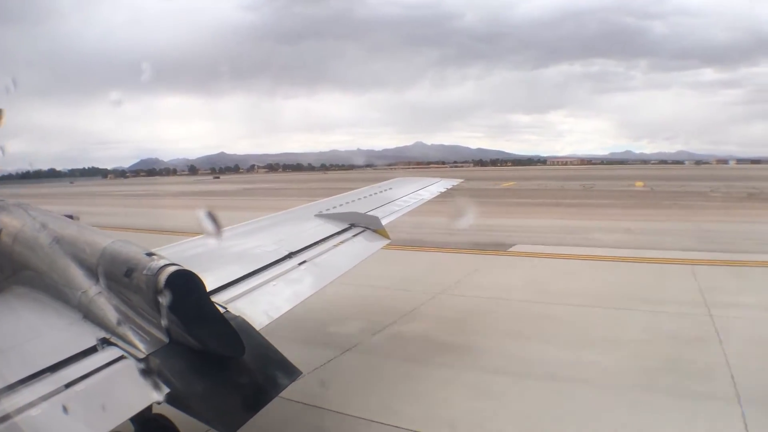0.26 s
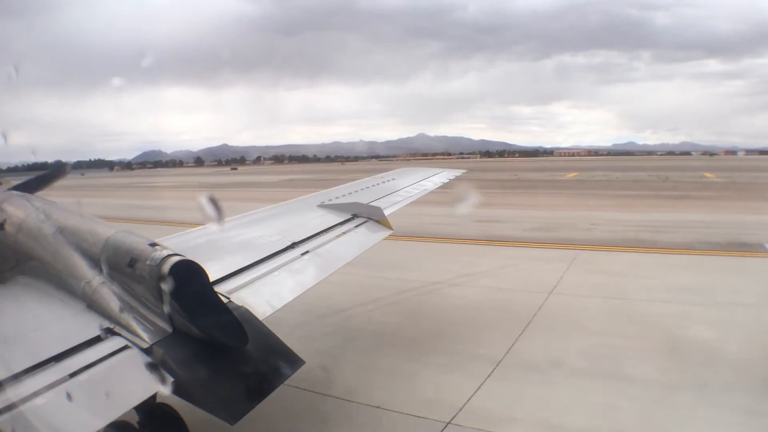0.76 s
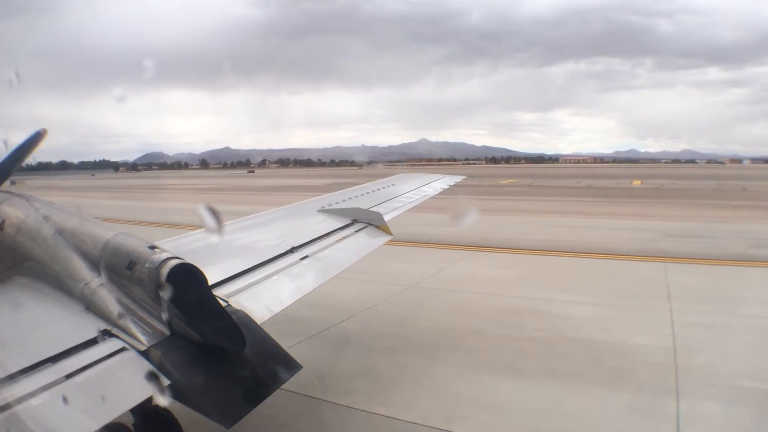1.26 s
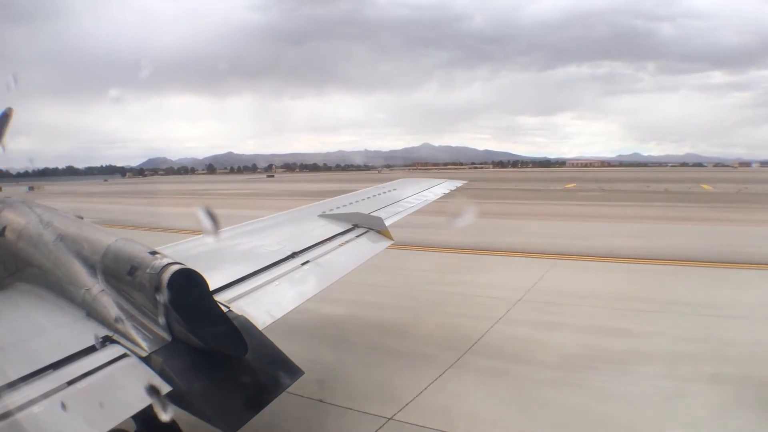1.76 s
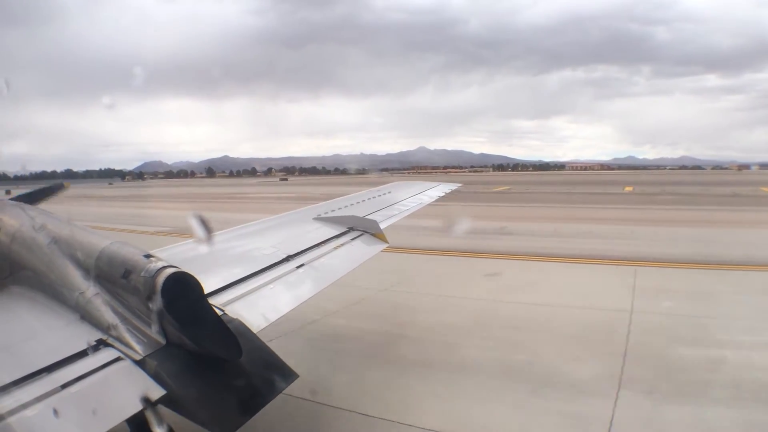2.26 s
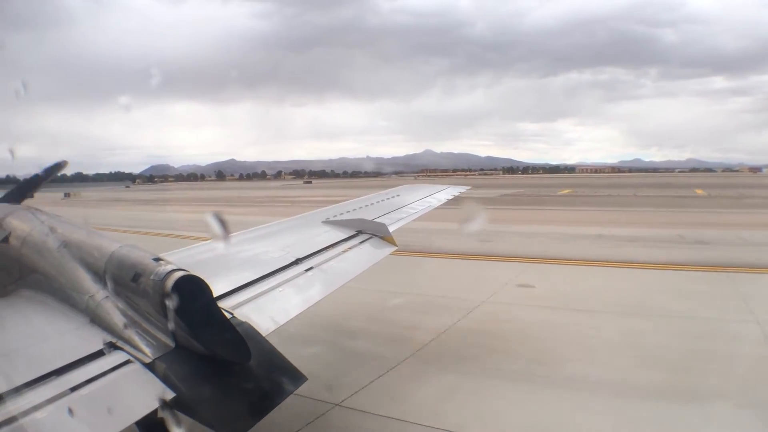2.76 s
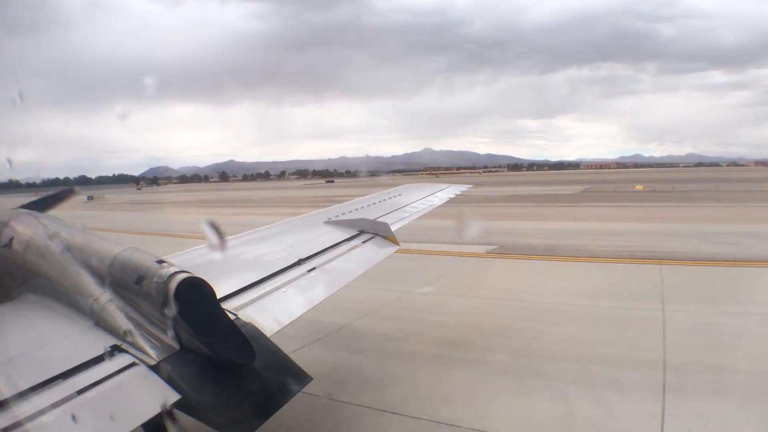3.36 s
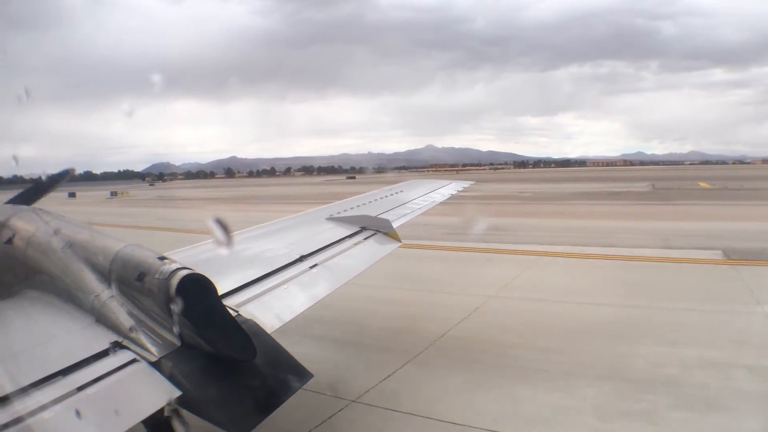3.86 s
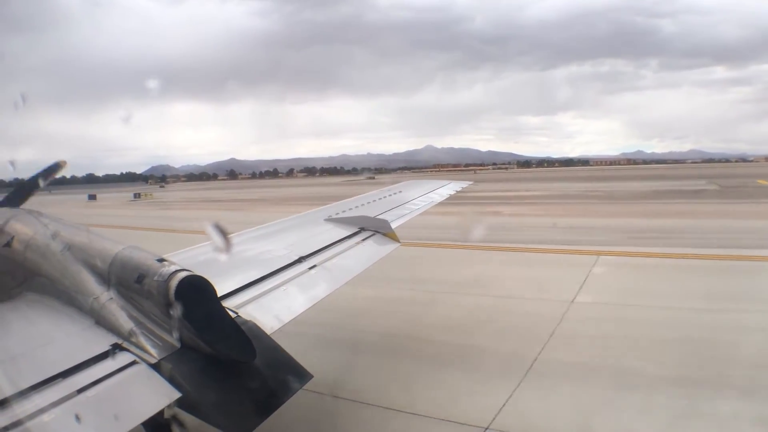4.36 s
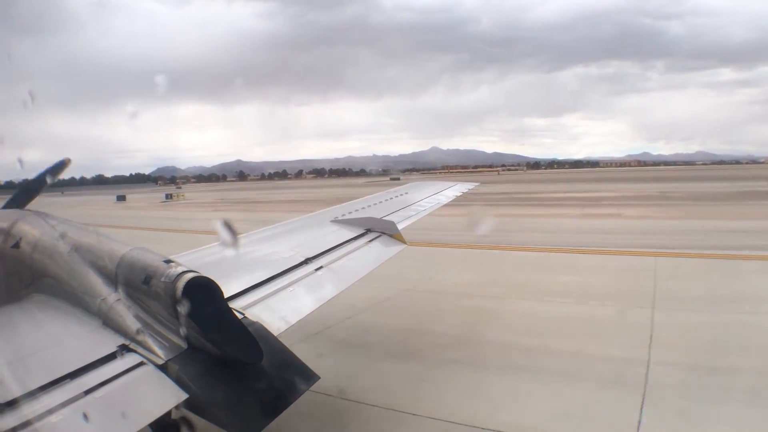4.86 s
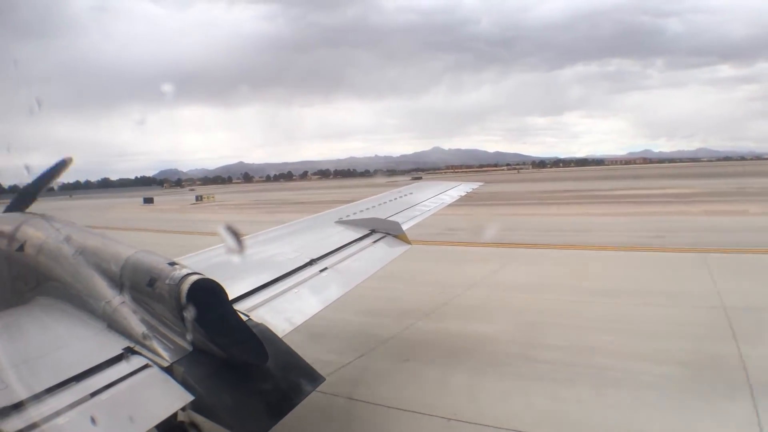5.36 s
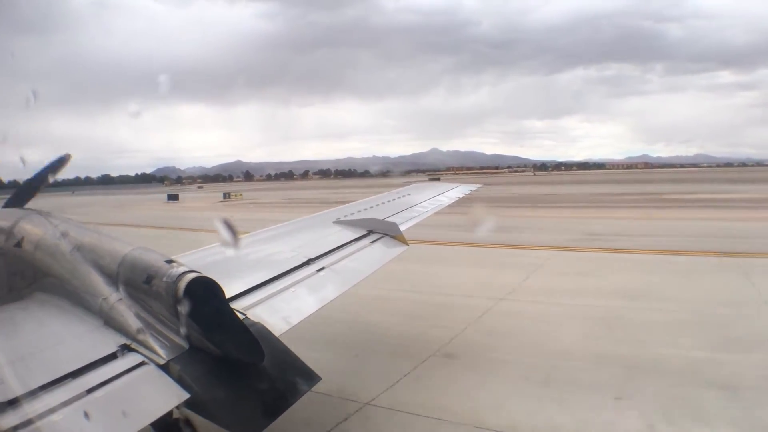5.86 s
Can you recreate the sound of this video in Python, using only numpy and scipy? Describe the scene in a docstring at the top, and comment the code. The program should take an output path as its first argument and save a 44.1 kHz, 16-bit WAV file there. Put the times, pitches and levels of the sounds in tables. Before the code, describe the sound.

Inside the cabin of a small twin turboprop taxiing over concrete, a continuous bass-heavy roar fills the space, its low mids surging unevenly beneath a dull, fluttering hiss. Thin gear and pump whines waver within it; a lower gear tone swells around 1.7 s and then fades. Irregular soft, low thumps buffet the wall throughout. Between 0.5 and 1.4 s, small dry trim ticks and brief rustles appear. Near 2.9 s there are two faint hollow knocks and a stronger rustle, then a tiny metallic clink at 3.3 s and another faint knock at 3.85 s. From about 3 s the propeller hum grows while gradually sinking in pitch. Its deep boom surges at 4.2 s, peaks around 4.7-4.9 s and makes the overall gain duck, then eases and rises again near 6 s. Three clear, short hollow knocks come at 5.95-6.07 s, just before the end.

```python
"""A small twin turboprop airliner taxis over concrete, heard from a window seat behind the wing.
From the start, shaped noise roars through the cabin, wavering tones whine and short pulses thump the wall.
Small noise bursts soon tick and rustle; ringing modes give faint hollow knocks, then filtered noise clinks once.
As the propeller slows, its three sine tones swell and the second one booms; loud sound turns the gain down.
Three clear hollow knocks come at the end."""
import sys
import numpy as np
from scipy import signal
from scipy.fft import rfft, irfft
from scipy.io import wavfile
from scipy.ndimage import uniform_filter1d

SR = 44100
rng = np.random.default_rng(int(sys.argv[2]) if len(sys.argv) > 2 else 0)


def master_out(mix):
    """Clip the mix to full scale and print it as 16-bit PCM to the path in sys.argv[1]."""
    frames = np.transpose(np.atleast_2d(mix))
    ceiling = np.clip(frames, -1, 1)
    pcm = np.round(ceiling * 32767).astype(np.int16)
    wavfile.write(sys.argv[1], SR, pcm)


N = 269451
TIME = np.arange(N) / SR  # seconds
FREQS = np.maximum(np.fft.rfftfreq(N, 1 / SR), 1)  # Hz

# Levels in the tables are those before any wavering, filtering or gain change in the functions.
# engine and airflow noise, before the cabin colours it: (frequency [Hz], level per Hz [dB])
ROAR_COLOUR = [(15, -60), (32, -57.5), (58, -47.5), (108, -45.5), (175, -49.5), (240, -58), (290, -57.5),
               (380, -60), (820, -74), (1500, -75), (2100, -81), (3200, -85), (3900, -87.5), (7800, -108),
               (15000, -111)]
# resonances and hollows of cabin air, panels and window: (frequency [Hz], width [Hz], lift [dB])
CABIN_RESONANCES = [(67, 20, 8), (83.1, 12, 7.5), (103, 11, -9.5), (131, 11, 2), (162, 13.5, 3),
                    (194, 9.8, 4.5), (320.3, 26.5, 3.5), (417, 27, -2.5), (666, 35, 4.5), (734.6, 37, 5.5),
                    (924, 64, 9.5), (1048, 17, 3), (1320, 160, 2), (1966, 116, 3.5), (2313, 63, 6),
                    (2567, 48, 6), (2840, 42, 7), (3116, 190, 5), (3470, 85, 3), (3980, 330, -4),
                    (4300, 370, 0), (6400, 250, -1), (6800, 450, 0.5), (8260, 700, -2), (9500, 1400, 3)]
# the slowing propeller: (time [s], blade rate [Hz], hum [dB], second harmonic [dB], third harmonic [dB])
PROPELLER_COURSE = [(0, 47.5, -47, -36, -42), (2.6, 47, -44, -36, -38), (3.1, 46, -34, -34, -34),
                    (3.35, 45.6, -33, -31, -39), (3.55, 45, -28, -28, -29), (3.9, 43.7, -27.5, -38, -39),
                    (4.05, 43.3, -30, -35, -39), (4.2, 43, -33.5, -20, -35), (4.5, 42.4, -29, -23, -28),
                    (4.62, 42, -27, -21, -30), (4.7, 41.8, -25.5, -14, -35), (4.85, 41.4, -27, -14.5, -39),
                    (5.05, 41.1, -27.5, -19, -35), (5.3, 40.4, -28, -25, -35),
                    (5.45, 40.1, -27.5, -25, -35), (5.65, 39.7, -29.5, -26.5, -42),
                    (5.85, 39, -29.5, -30, -39), (6.03, 38.3, -27.5, -20, -36)]
# buffets on the fuselage: (time [s], depth of the suction [dB], pitch [Hz], spread of the bell shape [s])
THUMP_EVENTS = [(0.238, -14.5, 74, 0.0075), (0.26, -15.5, 74, 0.0071), (0.324, -10.0, 74, 0.011),
                (0.467, -13.0, 86, 0.0074), (0.518, -9.5, 80, 0.0083), (0.595, -14.0, 83, 0.0067),
                (0.878, -14.5, 71, 0.0146), (0.957, -12.5, 81, 0.0081), (1.057, -14.0, 77, 0.0065),
                (1.095, -14.0, 80, 0.0074), (1.156, -14.5, 78, 0.0082), (1.296, -9.0, 83, 0.0091),
                (1.413, -14.0, 78, 0.0065), (1.67, -11.0, 76, 0.0093), (1.758, -14.5, 81, 0.0101),
                (1.791, -9.5, 84, 0.0094), (1.837, -13.5, 81, 0.0074), (2.007, -13.0, 85, 0.006),
                (2.249, -15.0, 79, 0.0108), (2.482, -16.0, 68, 0.0116), (2.639, -12.5, 80, 0.0103),
                (2.721, -12.5, 90, 0.0071), (2.811, -11.5, 70, 0.0133), (2.973, -14.0, 84, 0.0074),
                (3.007, -9.0, 88, 0.0072), (3.032, -14.5, 89, 0.0062), (3.071, -16.0, 91, 0.0053),
                (3.165, -15.0, 80, 0.0124), (3.234, -15.5, 79, 0.0074), (3.296, -15.0, 78, 0.0093),
                (3.331, -10.5, 81, 0.0078), (3.425, -12.0, 82, 0.0092), (3.485, -16.0, 101, 0.0083),
                (3.556, -6.5, 86, 0.0062), (3.584, -15.5, 92, 0.0058), (3.696, -13.5, 78, 0.0068),
                (3.831, -10.5, 84, 0.0056), (3.908, -15.0, 87, 0.0071), (3.972, -11.5, 83, 0.0082),
                (4.08, -14.5, 81, 0.0111), (4.145, -13.0, 84, 0.0068), (4.246, -11.0, 87, 0.0057),
                (4.461, -16.0, 92, 0.0102), (4.497, -13.5, 88, 0.0059), (4.618, -12.5, 88, 0.0063),
                (4.686, -16.0, 87, 0.0131), (4.925, -9.5, 82, 0.0066), (5.108, -13.0, 84, 0.007),
                (5.233, -15.0, 80, 0.0058), (5.394, -11.5, 88, 0.0079), (5.463, -15.0, 85, 0.0067),
                (5.498, -12.5, 93, 0.0057), (5.611, -16.0, 75, 0.0075), (5.735, -16.0, 88, 0.0054),
                (5.864, -14.0, 83, 0.0112), (5.916, -13.5, 83, 0.0077), (6.023, -15.5, 75, 0.0063),
                (6.056, -13.0, 88, 0.0056)]
# gear and pump tones: (pitch [Hz], starting level [dB rms], trend [dB/s], pitch wander [Hz], waver [dB])
WHINE_TONES = [(968.5, -50.8, -.5, 2.8, 3.3), (1147, -61.5, -.1, 2, 3), (1352, -61, -.7, 4, 4),
               (1423.5, -55, -.2, 2.6, 4), (1532, -61.5, -1.5, 3, 4), (1661.6, -59, -.4, 2, 3),
               (1687.7, -56.8, -.7, 2, 2.5), (1721.3, -53.2, -.4, 2, 2.6), (2739, -70.5, .2, 2, 3),
               (3482, -77, 1.1, 2, 3)]
# a low gear tone that swells and fades: (time [s], level [dB rms])
GEAR_TONE_LEVEL = [(0, -42.5), (1.15, -47.5), (1.65, -40), (2.6, -45), (3.5, -52), (6.11, -48.5)]
# hollow knocks: (time [s], strength [dB])
KNOCK_EVENTS = [(2.8565, -30), (2.966, -33), (3.852, -30), (5.945, -16), (6.0212, -20), (6.0738, -14)]
# what the knocked thing rings with: (frequency [Hz], level [dB], time to fall by 60 dB [s])
KNOCK_RINGING = [(636, -16.5, 0.13), (723, 1, 0.025), (876, -5, 0.027)]
# ticks of cabin trim: (time [s], level [dB])
TICK_EVENTS = [(.484, -55), (.523, -51), (.634, -58), (.885, -56), (.912, -53), (1.012, -59), (1.107, -58),
               (1.188, -54.5), (1.362, -57), (2.406, -51), (3.073, -54), (4.035, -59), (5.096, -57),
               (5.55, -59)]
# tone colour of a tick: (frequency [Hz], relative level per Hz [dB])
TICK_SPECTRUM = [(1000, -27), (4000, 14.5), (6000, 4), (8000, -1), (9500, -2.5), (12000, -4), (15000, -32)]
# a small loose metal fitting: (time [s], level [dB])
CLINK_EVENTS = [(3.313, -48)]
# resonances that colour the clink: (frequency [Hz], width [Hz], relative level [dB])
CLINK_RESONANCES = [(4330, 284, 4), (5200, 500, -8), (7700, 400, -9), (9370, 220, -3), (11450, 350, -12),
                    (13400, 700, -20)]
# brief rustles: (time [s], level [dB], spread of the bell shape [s])
RUSTLE_EVENTS = [(0.759, -35.5, 0.0071), (0.82, -37, 0.0065), (0.844, -36, .007), (0.908, -45, 0.01),
                 (1.156, -40.5, .014), (2.974, -31, 0.0074)]
# tone colour of a rustle: (frequency [Hz], relative level per Hz [dB])
RUSTLE_SPECTRUM = [(200, -26), (700, 18.5), (950, 9.5), (1950, 10), (3200, -10), (6000, -22), (15000, -56)]
# surging low mids of the roar: (time [s], level change [dB])
SURGE_LEVEL = [(0, 4), (.22, -1.5), (.35, -0.5), (.55, 0), (.67, 2), (.78, -1.5), (.9, 1), (1.3, .8),
               (1.45, 0.5), (1.82, 0.5), (1.99, 3), (2.08, .7), (2.17, 2), (2.45, 0.5), (2.56, 2),
               (2.72, -0.5), (2.88, 1.5), (3.0, 1), (3.22, -1.7), (3.3, -1), (3.4, 0), (3.7, 1.5),
               (3.87, 1.5), (4.02, -2), (4.2, .3), (4.33, 0.3), (4.6, 2.5), (4.7, -2.2), (4.8, 2.5),
               (4.9, -0.5), (5.12, -1), (5.24, 2.5), (5.33, -1.5), (5.48, 3), (5.56, -0.2), (5.66, 3),
               (5.85, -1.5), (6.03, 1.1)]
# mids and highs of the roar: (time [s], level change [dB])
RUSH_LEVEL = [(0, -0.3), (.65, 0.8), (.8, 1.1), (1.0, 0.3), (1.3, -.5), (1.7, 0.2), (2.1, 0.2), (2.55, 1),
              (2.8, 0.5), (3.4, 0), (3.7, -0.4), (4.5, -0.2), (5.0, -.8), (5.5, -0.1), (6.11, .3)]


def from_db(db):
    """Turn decibels into a gain factor."""
    return np.exp(np.asarray(db) * (np.log(10) / 20))


def rms_one(x):
    """Scale a signal to unit power."""
    return x / np.sqrt(np.mean(x ** 2) + 1e-20)


def in_time(rows):
    """Join the rows by straight lines and give each column at every sample."""
    times, *columns = np.transpose(rows)
    return [np.interp(TIME, times, column) for column in columns]


def colour_db(points):
    """Join the points of a spectrum by straight lines over log frequency."""
    hz, db = np.transpose(points)
    return np.interp(np.log(FREQS), np.log(hz), db)


def resonance(hz, width):
    """A peak of height 1 that falls to half at half its width to either side."""
    return 1 / (1 + (2 * (FREQS - hz) / width) ** 2)


def cabin_db():
    """How much the cabin lifts or lowers each frequency."""
    return sum(db * resonance(hz, width) for hz, width, db in CABIN_RESONANCES)


def noise(density_db):
    """Random noise with the given dB per Hz."""
    white = rfft(rng.standard_normal(N))
    return irfft(white * from_db(density_db), N) * np.sqrt(SR / 2)


def drift(rate, size=32):
    """Slow random wandering with spread 1, up to about rate Hz, drawn every 32 samples and joined by lines."""
    steps = np.arange(0, N + size, size)
    smooth = signal.butter(2, min(rate, .4 * SR / size), fs=SR / size, output="sos")
    slow = signal.sosfilt(smooth, rng.standard_normal(2 * len(steps)))
    settled = slow[len(steps):]
    return np.interp(np.arange(N), steps, rms_one(settled))


def evened(x, over_s=.12):
    """Hold the slow level of a noise at its mean."""
    power = uniform_filter1d(x ** 2, size=int(over_s * SR))
    return x * np.sqrt(np.mean(x ** 2) / np.maximum(power, 1e-12))


def samples_between(start_s, end_s):
    """The samples between two times."""
    return slice(*np.searchsorted(TIME, [start_s, end_s]))


def bell(t, spread):
    """A smooth bell-shaped rise and fall around time zero."""
    return np.exp(-.5 * (t / spread) ** 2)


def bursts(rows, attack_s=.005, decay_s=.015):
    """Loudness curve of short slips: each builds up in a straight line and dies away."""
    out = np.zeros(N)
    for start, db in rows:
        near = samples_between(start, start + 10 * decay_s)
        t = TIME[near] - start
        out[near] += from_db(db) * np.minimum(t / attack_s, np.exp((attack_s - t) / decay_s))
    return out


def tone(hz, db, wander_hz, waver_db):
    """A sine that wavers in pitch and level."""
    turns = np.cumsum(hz + wander_hz * drift(9.0)) / SR
    level = np.sqrt(2) * from_db(db + waver_db * drift(10.0))  # root 2 turns rms into peak
    return level * np.sin(2 * np.pi * (turns % 1))


def trim(grain_db=3.0, creep_db=-66.5, creep_spread_db=5.0):
    """Cabin fittings shift: ticks, a clink, rustles and a faint constant creep, all noise made of uneven slips."""
    creep = from_db(creep_db + creep_spread_db * np.minimum(drift(25), 2))
    ticks = creep + bursts(TICK_EVENTS)
    rustles = np.zeros(N)
    for middle, db, spread in RUSTLE_EVENTS:
        near = samples_between(middle - 10 * spread, middle + 10 * spread)
        rustles[near] += from_db(db) * bell(TIME[near] - middle, spread)
    metal_power = sum(from_db(db) ** 2 * resonance(hz, width) for hz, width, db in CLINK_RESONANCES)
    layers = ((ticks, colour_db(TICK_SPECTRUM)),
              (bursts(CLINK_EVENTS), 10 * np.log10(metal_power)),
              (rustles, colour_db(RUSTLE_SPECTRUM)))
    slips = rms_one(from_db(grain_db * drift(300)))
    return slips * sum(level * rms_one(noise(colour)) for level, colour in layers)


def knocks(low_hz=590, high_hz=900, contact_spread_db=2.0):
    """Blows ring a few short hollow modes, each blow in a slightly different mix."""
    times, blow_db = np.transpose(KNOCK_EVENTS)
    places = np.minimum(np.round(times * SR).astype(int), N - 1)
    mix_db = contact_spread_db * rng.standard_normal((len(KNOCK_EVENTS), len(KNOCK_RINGING)))
    out = np.zeros(N)
    for (hz, db, t60), contact_db in zip(KNOCK_RINGING, mix_db.T):
        blows = np.zeros(N)
        blows[places] = from_db(blow_db + contact_db)
        shrink = from_db(-60 / (t60 * SR))  # loss per sample
        turn = 2 * np.pi * hz / SR  # angle per sample
        feedback = [1, -2 * shrink * np.cos(turn), shrink * shrink]
        # the tiny offset keeps the filter's numbers from becoming too small
        out += from_db(db) * signal.lfilter([0, np.sin(turn)], feedback, blows + 1e-18)
    band = signal.butter(3, [low_hz, high_hz], "band", fs=SR, output="sos")
    return signal.sosfilt(band, out)


def whines(gear_hz=446.5):
    """Gears and pumps sing in wavering sine tones, with one low gear tone that swells and fades."""
    high = sum(tone(hz, db + trend_db * TIME, wander, waver)
               for hz, db, trend_db, wander, waver in WHINE_TONES)
    low_gear = tone(gear_hz, in_time(GEAR_TONE_LEVEL)[0], wander_hz=3.35, waver_db=2.5)
    return high + low_gear


def buffets(wall_db=-1.0, cabin_share=0.2):
    """Each passing eddy presses on the wall, sucks it out and presses again; the cabin colours it partly."""
    out = np.zeros(N)
    for middle, db, hz, spread in THUMP_EVENTS:
        near = samples_between(middle - 10 * spread, middle + 10 * spread)
        t = TIME[near] - middle
        out[near] -= from_db(db) * bell(t, spread) * np.cos(2 * np.pi * hz * t)
    return irfft(rfft(out) * from_db(wall_db + cabin_share * cabin_db()), N)


def roar():
    """Turbulence through the cabin's resonances: even rumble, surging low mids, fluttering mids and highs."""
    spectrum = rfft(noise(colour_db(ROAR_COLOUR) + cabin_db()))
    # soft low-pass curves that split the noise into five bands
    below_bass, below_low, below_high, below_top = (
        1 / (1 + (FREQS / hz) ** 8) for hz in (125, 430, 900, 5500))
    (surge_db,), (rush_db,) = in_time(SURGE_LEVEL), in_time(RUSH_LEVEL)
    rumble = evened(irfft(spectrum * below_bass, N))
    rumble = rumble * from_db(-5.0 + 0.64 * TIME)  # grows by 0.64 dB per second
    body = evened(irfft(spectrum * (below_low - below_bass), N))
    body = body * from_db(0.26 + surge_db + 1.14 * drift(15.6))
    rush = irfft(spectrum * (below_high - below_low), N)
    rush = rush * from_db(0.5 + rush_db + 1.0 * drift(19))
    hiss = irfft(spectrum * (below_top - below_high), N)
    hiss = hiss * from_db(1.0 + rush_db + 1.0 * drift(17.0))
    air = irfft(spectrum * (1 - below_top), N)
    air = air * from_db(1.4 + 0.6 * drift(22))
    return rumble + body + rush + hiss + air


def propeller(boom_waver_db=0.2, third_waver_db=2.0):
    """Blade passes hum at a falling rate, with second and third harmonics; the second one booms."""
    blade_hz, hum_db, boom_db, third_db = in_time(PROPELLER_COURSE)
    phase = 2 * np.pi * np.cumsum(blade_hz) / SR
    boom_db = boom_db + boom_waver_db * drift(16)
    third_db = third_db + third_waver_db * drift(3.2)
    out = np.zeros(N)
    for harmonic, db in enumerate((hum_db, boom_db, third_db), 1):
        out += from_db(db) * np.sin(harmonic * phase + rng.uniform(0, 2 * np.pi))
    return np.sqrt(2) * out  # root 2 turns rms into peak


def gain_control(x, threshold_db=-20.5, slope=0.25, listen_s=0.17, release_db_per_s=6.5):
    """Loud sound turns everything down; the gain then creeps back."""
    keep = np.exp(-1 / (listen_s * SR))
    heard_power = signal.lfilter([1 - keep], [1, -keep], x ** 2)
    heard_db = 10 * np.log10(heard_power + 1e-12)
    # the held level jumps up with the sound, but sinks only at the release rate
    recovery = release_db_per_s * TIME
    held_db = np.maximum.accumulate(heard_db + recovery, axis=-1) - recovery
    return x * from_db(-slope * np.maximum(held_db - threshold_db, 0))


def scene():
    """Everything meets at the window seat, in one channel."""
    mix = trim() + knocks() + whines() + buffets() + roar() + propeller()
    return mix[None, :]


def record(dry):
    """The gain rides the level, the end fades out without a click, and the top is cut steeply."""
    closing = np.minimum((TIME[-1] - TIME) / .0015, 1)  # fade over the last 1.5 ms
    top_cut = signal.ellip(10, .1, 80, 15200, fs=SR, output="sos")  # cutoff at 15200 Hz
    return signal.sosfilt(top_cut, gain_control(dry) * closing)


dry = scene()
out = record(dry)
master_out(out)
```